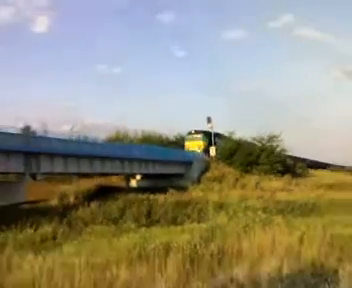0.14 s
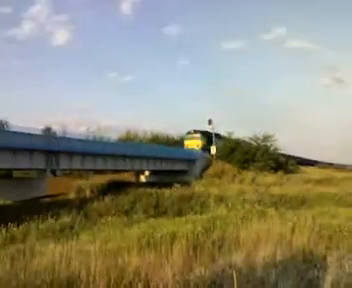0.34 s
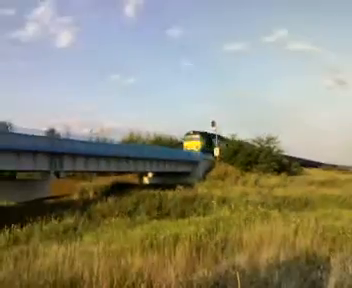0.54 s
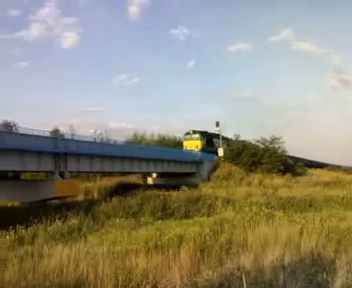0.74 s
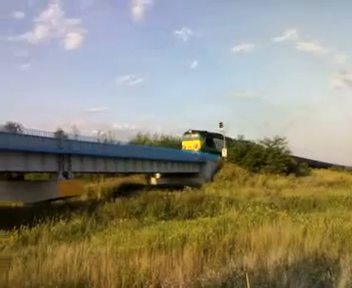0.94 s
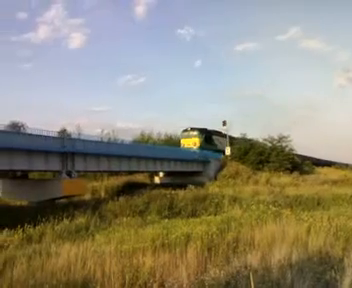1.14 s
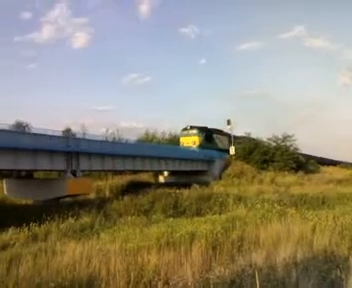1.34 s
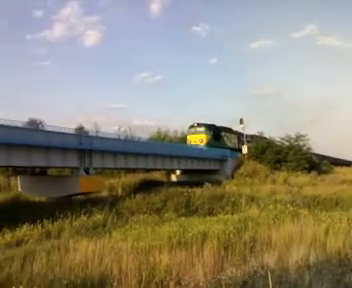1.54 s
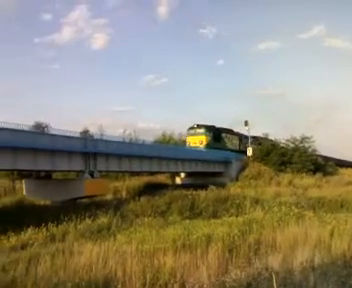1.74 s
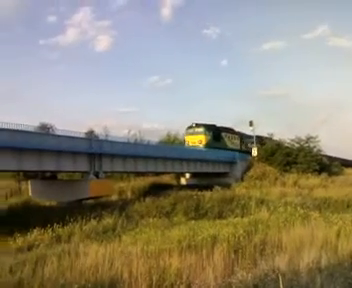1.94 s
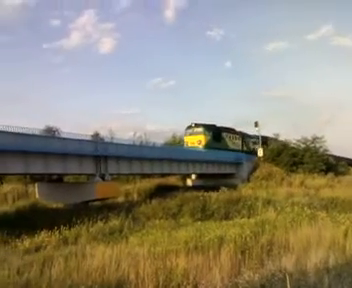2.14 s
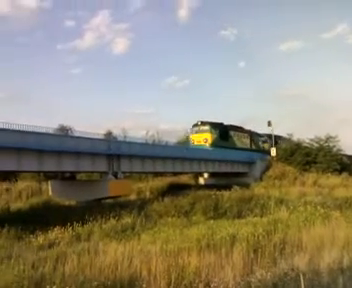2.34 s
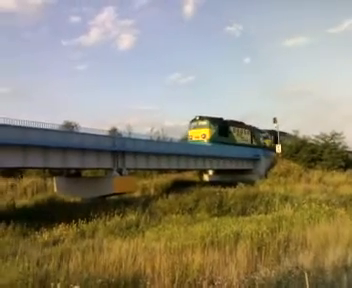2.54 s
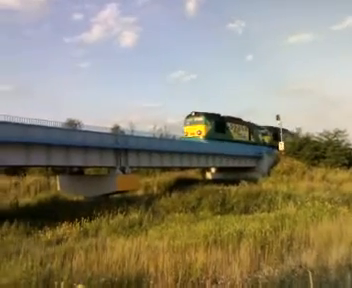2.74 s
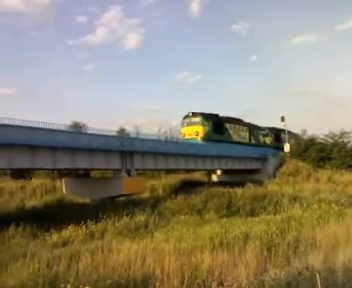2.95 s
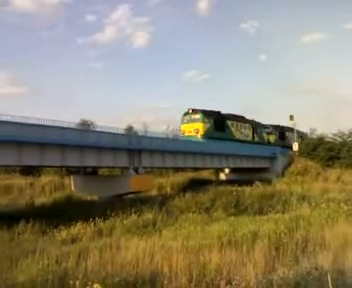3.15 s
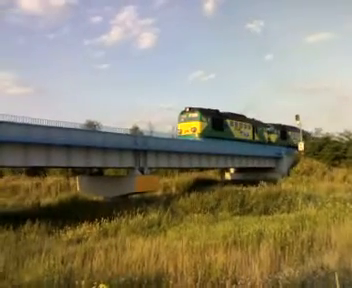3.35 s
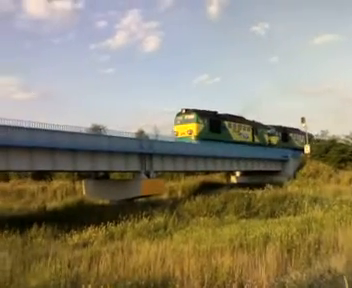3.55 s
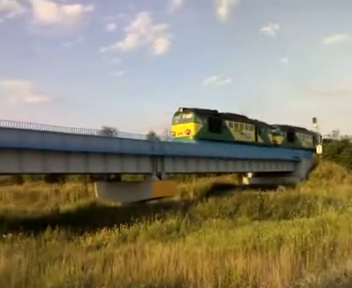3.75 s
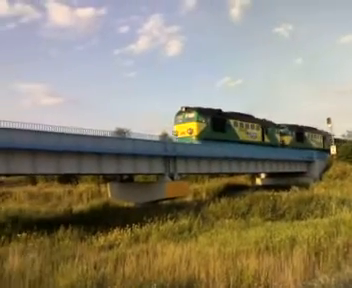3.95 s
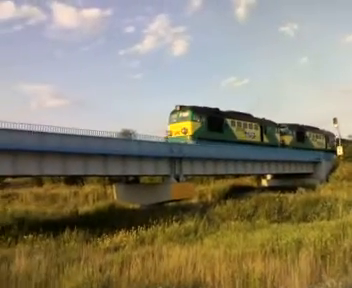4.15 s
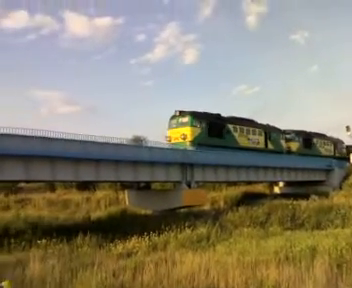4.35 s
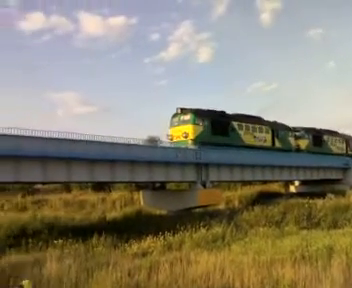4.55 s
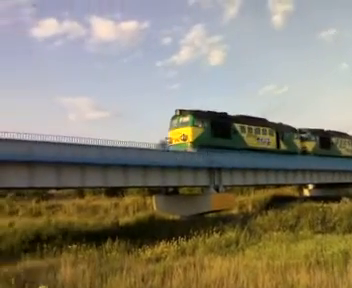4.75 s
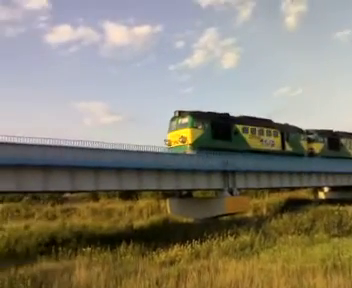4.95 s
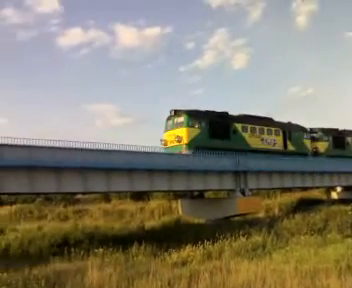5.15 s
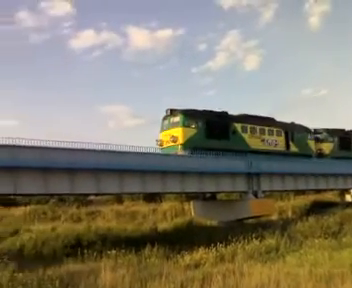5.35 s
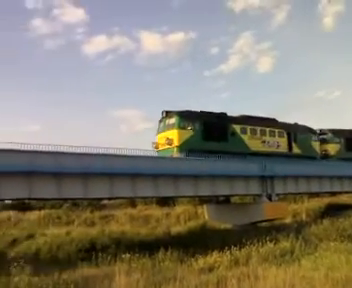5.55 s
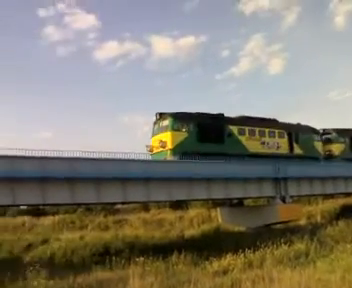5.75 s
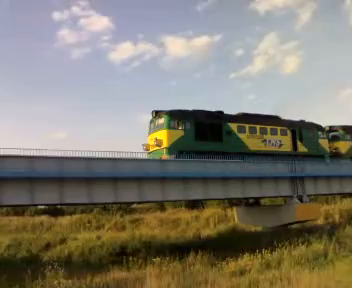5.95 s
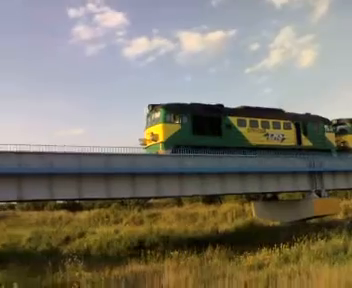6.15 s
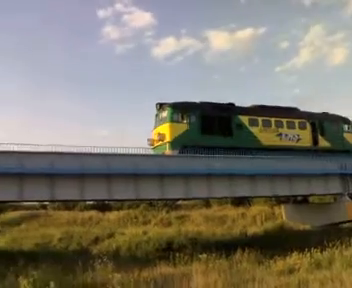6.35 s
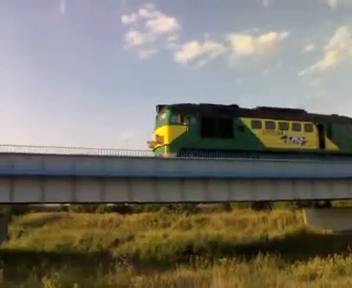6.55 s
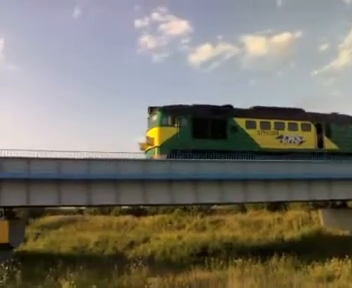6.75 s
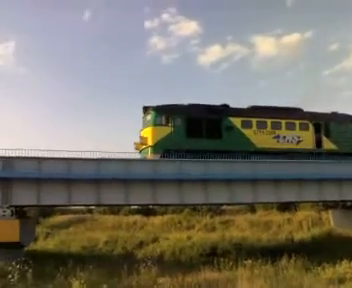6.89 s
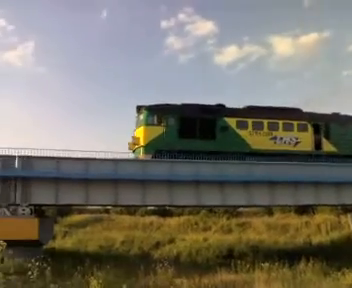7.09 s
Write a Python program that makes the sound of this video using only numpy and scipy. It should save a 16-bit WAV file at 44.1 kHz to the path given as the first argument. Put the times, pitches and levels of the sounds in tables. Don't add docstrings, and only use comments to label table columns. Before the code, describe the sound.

A pair of coupled diesels comes closer in open air, heard by a small handheld camera beside a girder bridge. A pulsing deep drone and broad engine roar start muffled and grow full and bright, with whining gears above and bridge rumble below. One small knock comes past the middle; late on, a sharp handling click is followed by short, raspy metallic flange scrapes as the lead engine draws nearly alongside.

```python
import sys
import numpy as np
from scipy import signal
from scipy.fft import rfft, irfft
from scipy.io import wavfile
from scipy.ndimage import uniform_filter1d

SR = 44100
rng = np.random.default_rng(int(sys.argv[2]) if len(sys.argv) > 2 else 0)


def log_audio(samples):
    frames = np.atleast_2d(samples).T
    limited = np.clip(frames, -1, 1)
    pcm = np.round(limited * 32767).astype(np.int16)
    wavfile.write(sys.argv[1], SR, pcm)


def amplitude_ratio(level_db):
    exponent = np.asarray(level_db, float) / 20
    return 10 ** exponent


N = 320607
TIME = np.arange(N) / SR

FIRING = 6
SPEED_M_S, ABEAM_S, ABEAM_M = 7.53, 8.67, 26.27


def evened(x):
    return x / np.sqrt(np.mean(x ** 2) + 1e-20)


def spectrum(points, hz):
    f, db = np.transpose(points)
    return np.interp(np.log(hz + 1), np.log(f + 1), db)


def drift(top_hz, t=TIME, low_hz=0.2025):
    coarse = np.linspace(0, N / SR, num=800)
    f = np.geomspace(low_hz, top_hz, num=16)[:, None]
    sines = np.sin(2 * np.pi * (f * coarse + rng.random(f.shape)))
    wave = (sines / np.sqrt(f)).sum(0)
    return np.interp(t, coarse, evened(wave))


def resonate(x, hz, width):
    b, a = signal.iirpeak(hz, hz / width, SR)
    return signal.lfilter(b, a, signal.lfilter(b, a, x))


def ringing(force, modes):
    return sum(amplitude_ratio(db) * evened(resonate(force, hz, width)) for hz, width, db in modes)


def swell(s, length):
    out = np.zeros(N)
    near = slice(max(round((s - 2 * length) * SR), 0), round((s + 2 * length) * SR))
    out[near] = np.exp(-2 * ((TIME[near] - s) / length * 2) ** 2)
    return out


def nearness(t=TIME):
    return np.clip((t - .5) / 7.34, 0, 1.1) ** 0.88


def between(pair, t=TIME):
    far, near = pair
    return far + (near - far) * nearness(t)


def spreading_db():
    along_m = SPEED_M_S * (ABEAM_S - TIME)
    return -10 * np.log10(1 + (along_m / ABEAM_M) ** 2)


def glimpse_db():
    # t/s, gain/dB, length/s
    gaps = [(0.203, 14.5, .6), (3.796, 9.5, 0.34), (4.845, 7.5, 0.75), (6.497, 6.5, 0.39), (7.162, 9, .6)]
    return sum(db * swell(s, length) for s, db, length in gaps)


def clearing_db():
    return 2.5 * swell(4.7, 1.7)


def girders():
    # t/s at loudest, level/dB, length/s
    axles = [(1.314, -43.5, 1), (2.705, -36, 1.6), (4.098, -30.5, 1.7), (5.412, -28, 0.45),
             (5.9, -21, 0.71), (6.654, -27.5, 0.45), (6.996, -27, .3)]
    # f/Hz, width/Hz, level/dB
    girder_modes = [(55.6, 20, -1), (61.8, 6.3, -1), (74.5, 16, -8), (109.3, 30, -4.5), (163.7, 4.5, -10.5),
                    (207, 64, -20.5)]
    load = amplitude_ratio(-42)
    load = load + sum(amplitude_ratio(db) * swell(s, length) for s, db, length in axles)
    force = load * rng.standard_normal(N)
    steady = np.sqrt(np.mean(force ** 2))
    return steady * evened(ringing(force, girder_modes))


def wheels():
    # t/s at loudest, level/dB, length/s, brightness/(dB per kHz)
    scrapes = [
        (6.894, -29, 0.21, -1.5),
        (7.08, -43, 0.054, -2),
        (7.156, -28, 0.24, 1),
        (7.24, -40, 0.11, 3),
    ]
    # f/Hz, width/Hz, level/dB
    wheel_modes = [(2004, 46, -2), (2370, 45, -3.5), (2576, 38, -7), (2775, 40, 0), (3010, 38, -4),
                   (3150, 47, -1.5), (3440, 140, -6.5), (4240, 38, -12), (3070, 1570, 5),
                   (5650, 2200, -9.5)]
    # t/s, peak/dB, f/Hz, t60/s
    knocks = [(4.552, -22, 1150, .02)]
    out = np.zeros(N + SR)
    for s, db, length, tilt_db in scrapes:
        t = np.arange(-.25, .25, 1 / SR)
        rub = rng.standard_normal(len(t))
        ring = ringing(rub, [(hz, width, d + tilt_db * hz / 1000) for hz, width, d in wheel_modes])
        at = round((s - .25) * SR)
        out[at:at + len(t)] += amplitude_ratio(db) * evened(ring) * np.exp(-2 * (t / length * 2) ** 2)
    for s, db, hz, t60 in knocks:
        t = np.arange(2000) / SR
        at = round(s * SR)
        onset = 1 - np.exp(-t / .0015)
        out[at:at + len(t)] += amplitude_ratio(db - 60 * t / t60) * np.sin(2 * np.pi * hz * t) * onset
    return out[:N]


def tick():
    # t/s, peak/dB
    snaps = [(6.6226, -2)]
    # f/Hz, level/dB, t60/s
    shell_modes = [(800, -12, .006), (1400, -8, .005), (4000, -9, .005), (4900, -8, .005),
                   (7300, -11, .004)]
    start_hz, end_hz, glide_s, snap_s = 4300, 1700, .00045, .0014
    push_db, push_s, push_lead_s = -9, .0004, .0009
    out, t = np.zeros(N), np.arange(400) / SR
    hz = end_hz + (start_hz - end_hz) * np.exp(-t / glide_s)
    buckle = np.sin(2 * np.pi * np.cumsum(hz) / SR)
    snap = buckle * np.sin(np.pi * np.minimum(t / snap_s, 1) ** .7)
    modes = sum(amplitude_ratio(db - 60 * t / t60) * np.sin(2 * np.pi * f * t) for f, db, t60 in shell_modes)
    snap += modes * (1 - np.exp(-(t / .0004) ** 2))
    for s, db in snaps:
        at = round(s * SR)
        out[at:at + len(t)] += amplitude_ratio(db) * snap / abs(snap).max()
        out += amplitude_ratio(push_db) * swell(s - push_lead_s + push_s / 2, push_s)
    return out


def valve(lead):
    # f/Hz, width/Hz, level/dB
    valve_modes = [(1870, 150, -1), (2496, 480, 3.5), (2930, 120, -5.5), (3630, 230, -3.5)]
    puffs = 1 + 0.21 * np.cos(4 * np.pi * lead) + 0.24 * drift(30, low_hz=2.4)
    air = puffs * rng.standard_normal(N)
    level_db = -38 + 2.6 * spreading_db() + .4 * glimpse_db()
    return amplitude_ratio(level_db) * evened(ringing(air, valve_modes))


def roar():
    # f/Hz, level/dB per Hz
    far_colour = [(20, -28.5), (36, -26), (46, -24), (98, -16.5), (169, -27.5), (338, -17), (444, -20),
                  (500, -26), (528, -28.5), (805, -23), (867, -30.5), (2710, -38), (5040, -46.5),
                  (7500, -66.5)]
    # f/Hz, level/dB per Hz
    near_colour = [(20, -17), (36, -19.5), (46, -11), (93, -13.5), (177, -11.5), (338, -16), (747, -20),
                   (1390, -27), (1820, -27), (3070, -29.5), (4030, -41.5), (6000, -42.5), (7500, -54)]
    # f/Hz, width/Hz, level/dB
    hood_modes = [(144, 19, -3.5), (492, 29, 9.5), (500, 36, -1.5), (315, 32, 0.5), (418, 25, 4),
                  (655, 14, 4.5), (720, 18, 2.5), (756, 42, -0.5), (1344, 140, 7), (1490, 78, -4),
                  (1723, 34, 6.5), (3810, 500, -7.5), (4280, 290, -0.5), (4730, 250, -2), (5240, 680, 4)]
    frames, hz = N // 1024 + 5, np.fft.rfftfreq(4096, 1 / SR)
    t = np.arange(frames) * 1024 / SR
    delay_ms = between((1.812, 1.933), t)
    strength = between((0.49, 0.11), t)
    bright = between((0.17, 1.19), t)

    real, imaginary, patches = rng.standard_normal((frames, 2049, 3)).T
    patches = uniform_filter1d(patches, size=30, axis=0)
    patches = evened(uniform_filter1d(patches, size=5, axis=1))
    hood = sum(db * np.exp(-2 * ((hz[:, None] - f * (1 - 0.014 * bright)) / width) ** 2)
               for f, width, db in hood_modes)
    db = np.outer(spectrum(far_colour, hz), 1 - bright) + np.outer(spectrum(near_colour, hz), bright)
    db += hood * (1 - 0.74 * bright) + 0.8 * patches

    mirror = np.interp(hz, [1130, 1570, 3400, 6500], [0.063, 1, 0.46, 0.3])
    echo = np.outer(mirror, np.clip(strength, 0, .9))
    echo = echo * np.exp(-2j * np.pi * np.outer(hz, delay_ms / 1000))
    gain = amplitude_ratio(db) * abs(1 + echo)
    body = (hz > 250) & (hz < 1500)
    gain /= np.sqrt((gain[body] ** 2).sum(0))
    noise = signal.istft((real + 1j * imaginary) * gain, nperseg=4096, noverlap=3072)[1][:N]

    low = signal.sosfiltfilt(signal.butter(2, 3500, fs=SR, output="sos"), noise)
    noise = low + (noise - low) * amplitude_ratio(clearing_db() + 0.73 * drift(25, low_hz=6.5))
    band = signal.butter(4, [250, 1500], "band", fs=SR, output="sos")
    noise /= np.sqrt(np.mean(signal.sosfilt(band, noise) ** 2))
    return amplitude_ratio(-23.5 + spreading_db()) * noise


def cranks():
    # t/s, speed/(turns per s)
    crank_speed = [(0, 7.2), (3, 7.194), (4.9, 7.19), (5.9, 7.184), (6.4, 7.176), (7.3, 7.155)]
    beat_s, first_cancel_s = 1.28, .965
    t, speed = np.transpose(crank_speed)
    lead = np.cumsum(np.interp(TIME, t, speed)) / SR
    return lead, lead - ((TIME - first_cancel_s) / beat_s + .5) / FIRING


def tone(turns, order, db, waver_db, wobble, t=TIME):
    free = order != FIRING
    phase = order * turns + free * (rng.random() + wobble * drift(3.1, t))
    return np.sqrt(2) * amplitude_ratio(db + waver_db * drift(3.6, t)) * np.cos(2 * np.pi * phase)


def whines(lead, rear):
    whine_rows = [
        (-55, -37.5, 0.1, 0.053, .05),
        (-59, -35, .35, 0.11, 0.12),
        (-43, -36.5, .2, 0.057, 0.033),
        (-42, -30.5, 0.4, 0.089, 0.037),
    ]
    clear_share = [1., 0.29, .8, .9]
    gear, fan = 111, 51.75
    screen = .5 + .5 * np.tanh((TIME - 3.5) / 0.31)
    clear = glimpse_db()
    parts = [(lead, gear, 0), (lead, 2 * gear, 0), (rear, gear, 1), (rear, fan, 1)]
    out = np.zeros(N)
    for (turns, order, behind), row, share in zip(parts, whine_rows, clear_share):
        far, near, throb, wobble, flutter = row
        db = between((far, near))
        db += behind * screen * -13
        db += share * clear * (screen if behind else 1)
        db += (order > gear) * 1.1 * clearing_db()
        blurred = turns + flutter / order * drift(24, low_hz=5)
        pulse = 1 + throb * np.cos(4 * np.pi * turns)
        out += pulse * tone(blurred, order, db, waver_db=1.9, wobble=wobble)
    return out


def exhaust(turns, orders, levels, size=21):
    t = TIME[::size]
    firing_db = (-31, -23)
    low = sum(tone(turns[::size], order, between(pair, t), waver_db=1.73, wobble=0.051, t=t)
              for order, pair in zip([FIRING] + orders, [firing_db] + levels))
    return signal.resample_poly(low, size, 1)[:N]


def rear_exhaust(rear):
    rear_orders = [7, 8, 9, 10, 12, 16, 21, 23, 24, 25.875, 30, 41, 44, 46]
    # level far/dB, level near/dB
    rear_levels = [(-46, -47.5), (-56, -32.5), (-51.5, -29.5), (-49.5, -32.5), (-51.5, -33), (-62, -48),
                   (-56.5, -57), (-58.5, -60), (-54, -42), (-45, -55), (-44.5, -34), (-59, -51),
                   (-50, -49.5), (-56, -56.5)]
    return exhaust(rear, rear_orders, rear_levels)


def lead_exhaust(lead):
    lead_orders = [4, 7, 8, 9, 11, 12, 16, 18, 24, 25, 25.875, 27, 28, 34, 35, 51.75, 68, 113.6]
    # level far/dB, level near/dB
    lead_levels = [(-40, -45), (-50, -41), (-38.5, -29.5), (-37, -34), (-50.5, -47.5), (-54.5, -39),
                   (-55, -33.5), (-52.5, -40), (-45.5, -31), (-54.5, -42), (-52, -37), (-64.5, -45),
                   (-53.5, -31.5), (-44.5, -36.5), (-52.5, -39.5), (-40, -41), (-47.5, -60.5),
                   (-53.5, -49.5)]
    return exhaust(lead, lead_orders, lead_levels)


def scene():
    lead, rear = cranks()
    background = girders() + wheels() + tick()
    engines = valve(lead) + roar() + whines(lead, rear) + rear_exhaust(rear) + lead_exhaust(lead)
    return (background + engines)[None]


def roll_off(x):
    return signal.sosfilt(signal.butter(12, 9170, fs=SR, output="sos"), x)


def record(dry):
    camera_sr = 16000
    hz, t, z = signal.stft(dry[0], SR, nperseg=1024, noverlap=768)
    edge_hz = rng.choice([7310, 7375, 7440, 7500, 7560], len(t), p=[.12, .38, .37, .11, .02])
    edge = np.repeat(edge_hz, 12)[:len(t)]
    top = (abs(z[(hz > 7600) & (hz < 8000)]) ** 2).sum(0)
    edge[top > 9 * signal.medfilt(top, 31)] = camera_sr / 2

    loss = np.interp(hz[::2], [6300, 7400], [0, .08])[:, None]
    spared = rng.random((len(t) // 8 + 1, len(hz) // 2 + 1)).T > loss
    z = z * np.kron(spared, np.ones((2, 8)))[:len(hz), :len(t)]
    kept = signal.istft(z * (hz[:, None] < edge), SR, nperseg=1024, noverlap=768)[1][:N]

    mirror = rfft(kept * 2 * np.cos(2 * np.pi * camera_sr * TIME))
    f = np.fft.rfftfreq(N, 1 / SR)
    leak_db = np.interp(f, [7900, 8050, 8420, 8900, 9150, 9300], [-86, -2.0, -14.0, -30.5, -47.0, -89.5])
    mirror = irfft(mirror * amplitude_ratio(leak_db), N)
    offset = -.0154
    return roll_off((kept + mirror + offset)[None])


dry = scene()
out = record(dry)
log_audio(out)
```